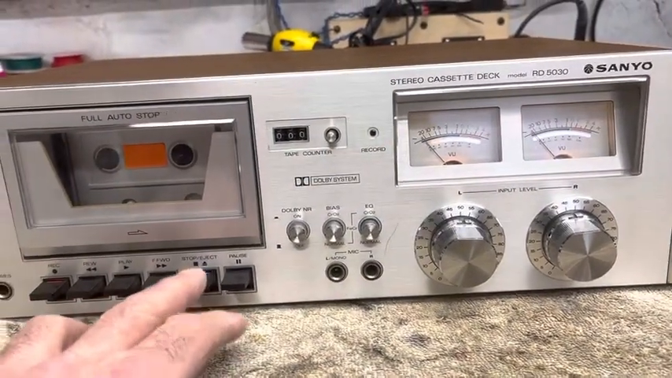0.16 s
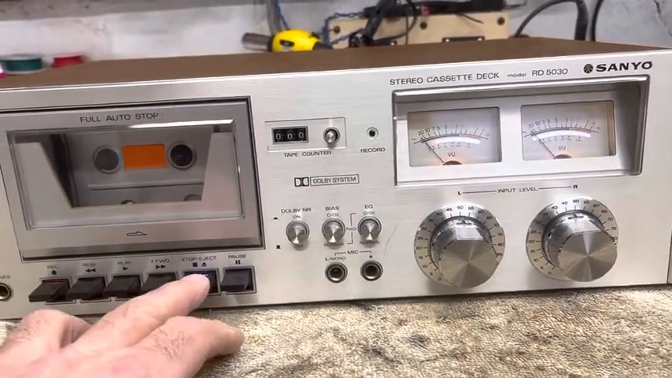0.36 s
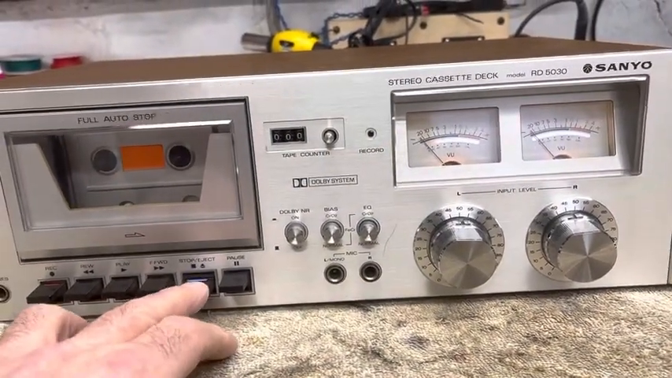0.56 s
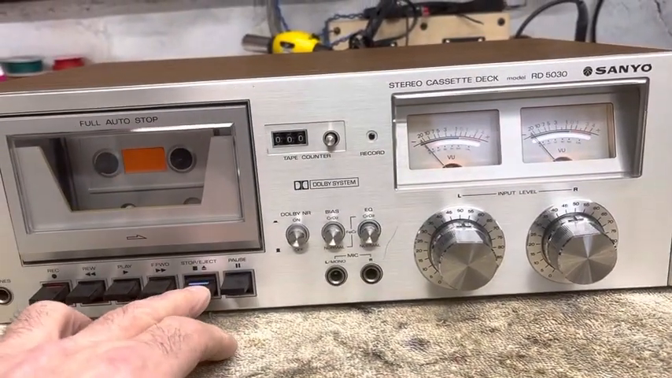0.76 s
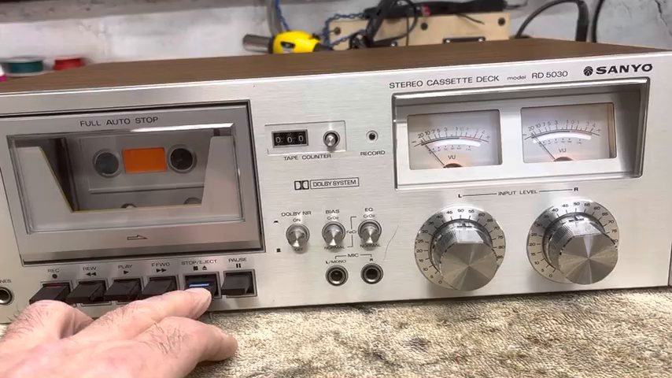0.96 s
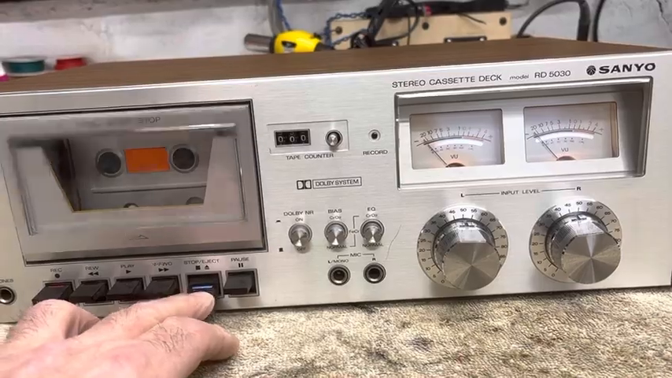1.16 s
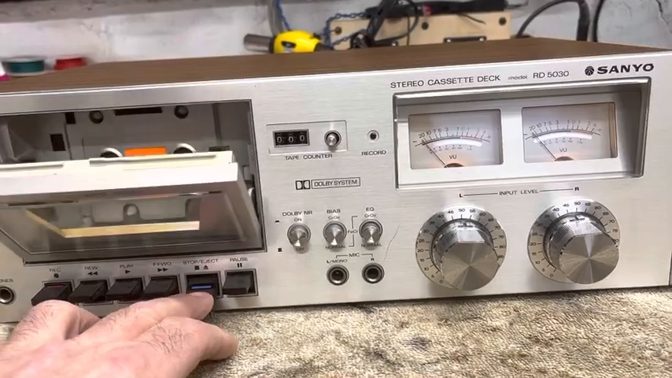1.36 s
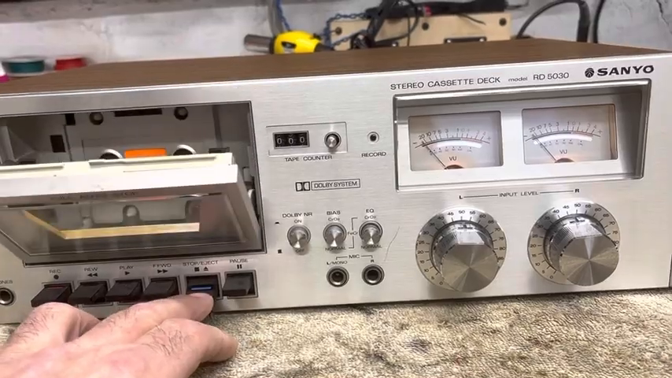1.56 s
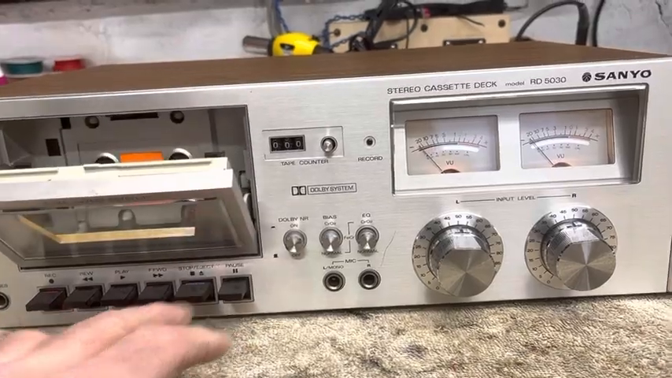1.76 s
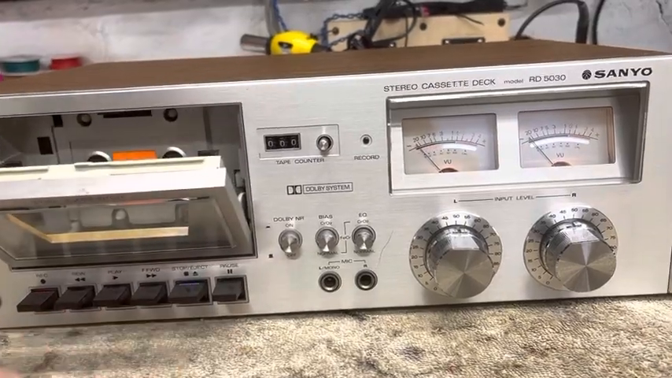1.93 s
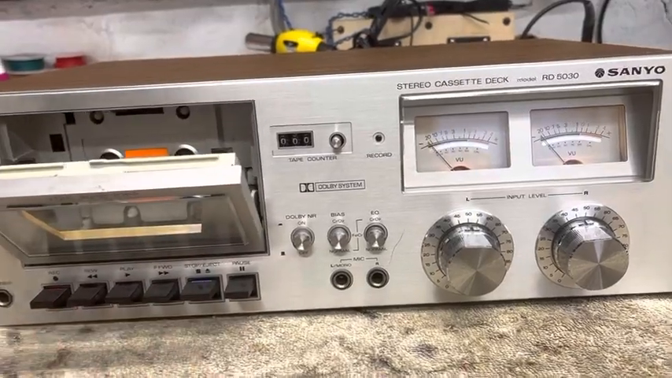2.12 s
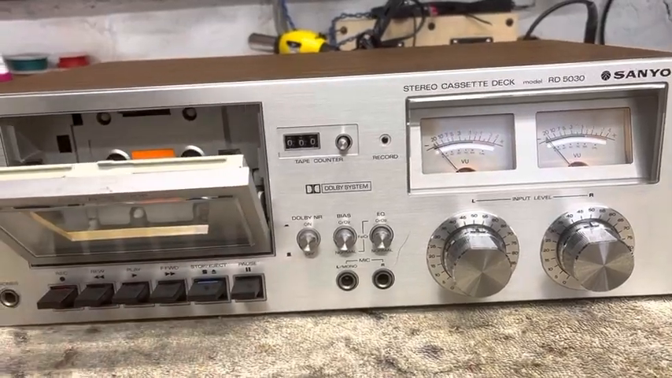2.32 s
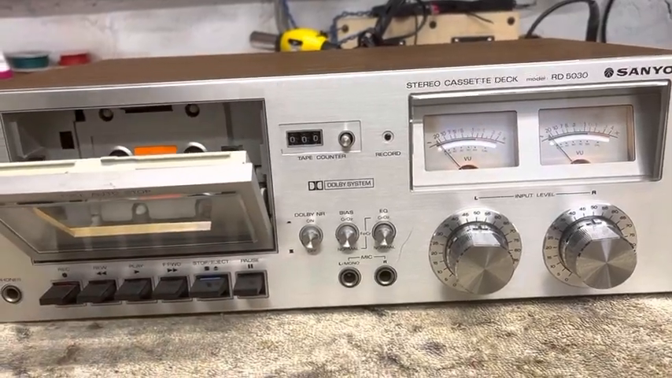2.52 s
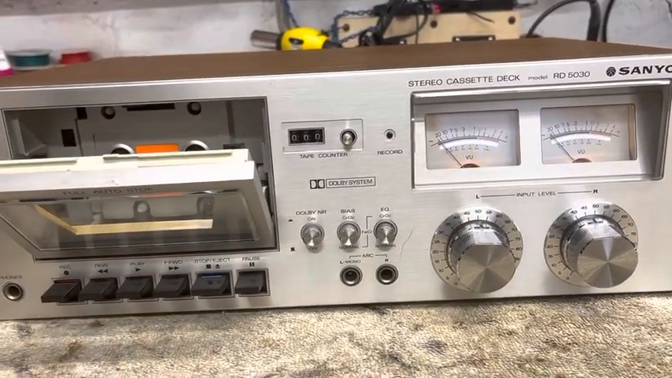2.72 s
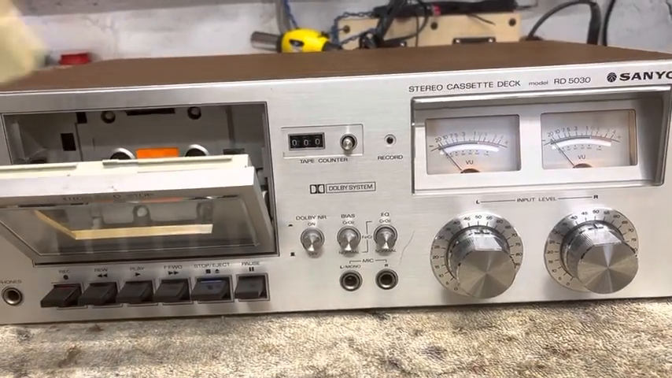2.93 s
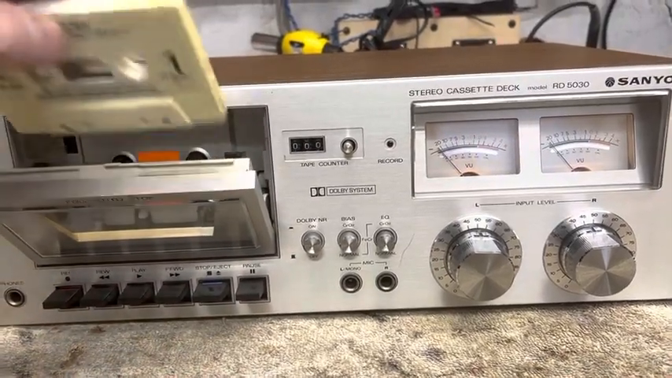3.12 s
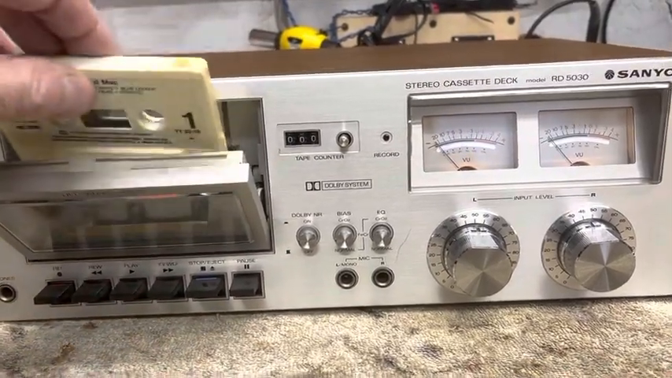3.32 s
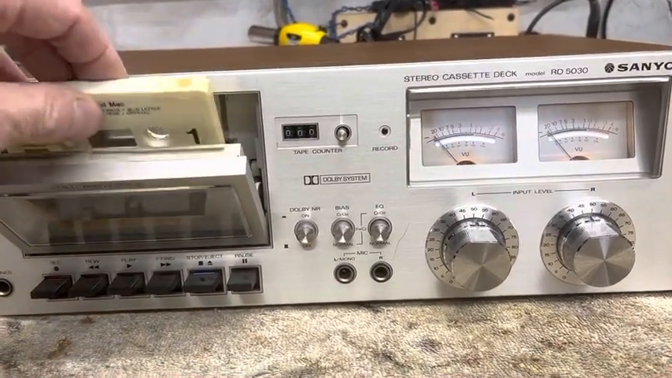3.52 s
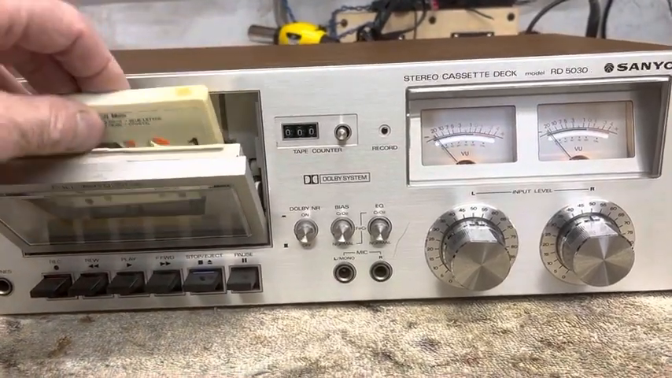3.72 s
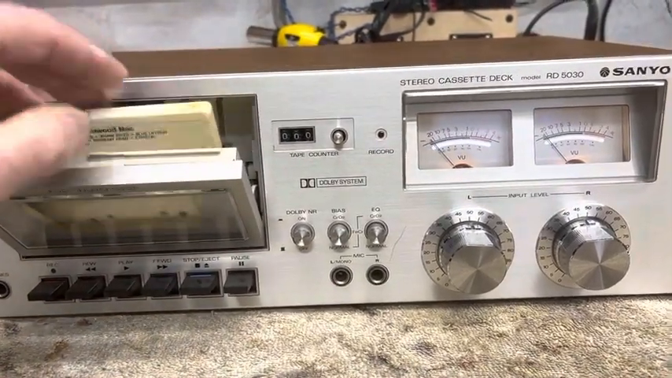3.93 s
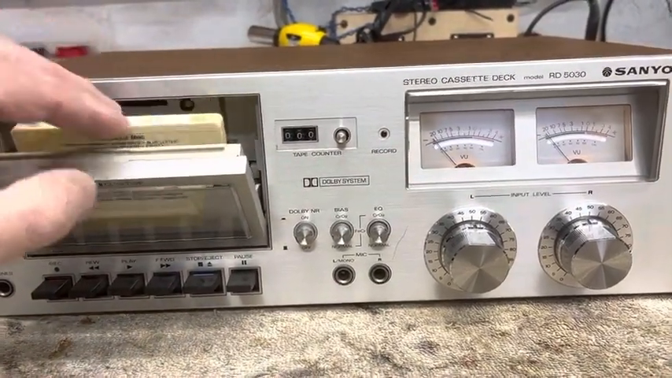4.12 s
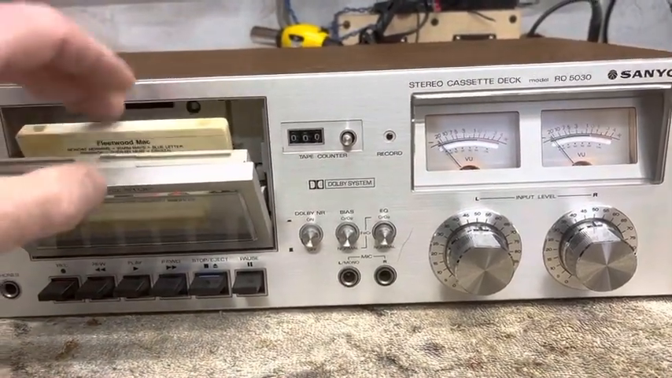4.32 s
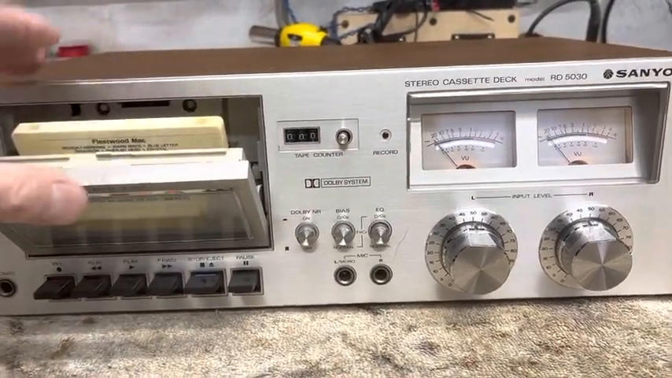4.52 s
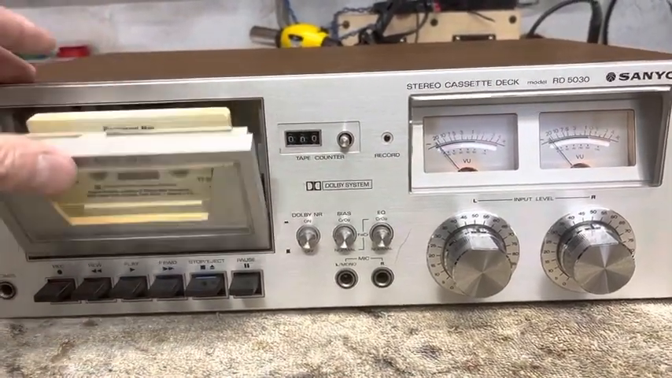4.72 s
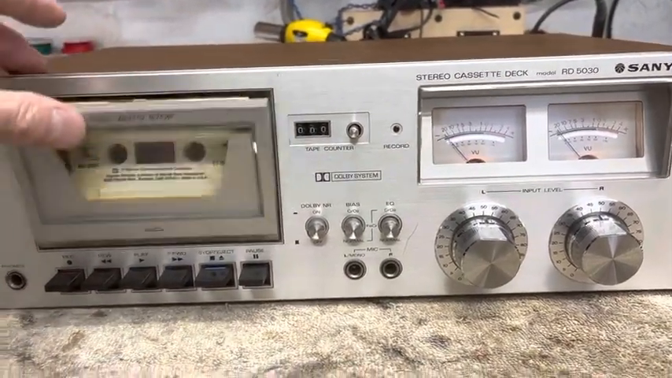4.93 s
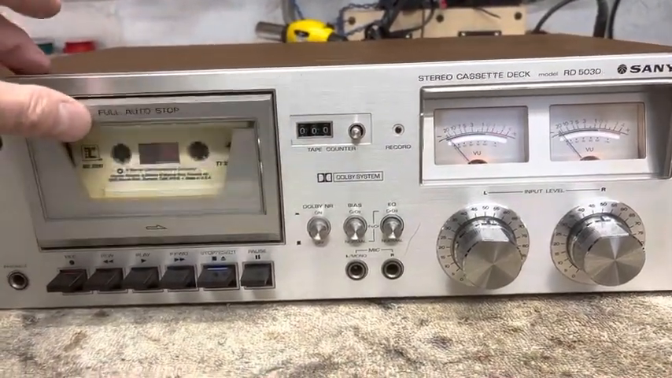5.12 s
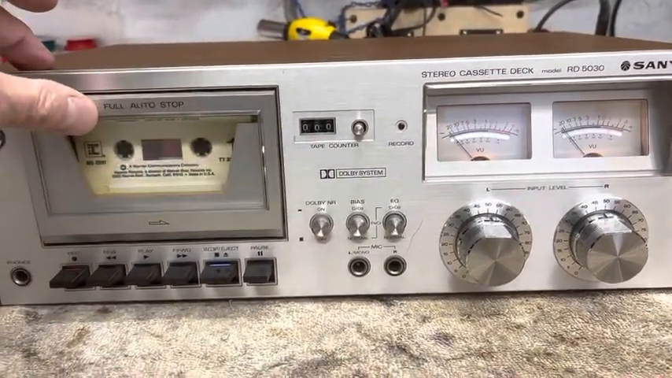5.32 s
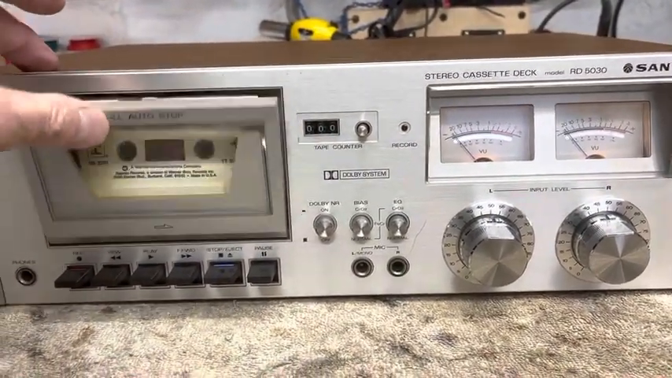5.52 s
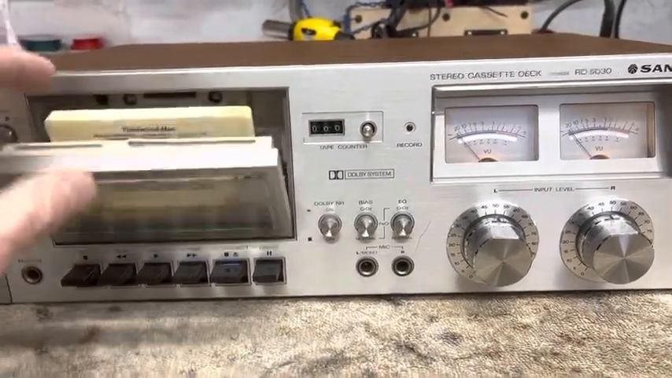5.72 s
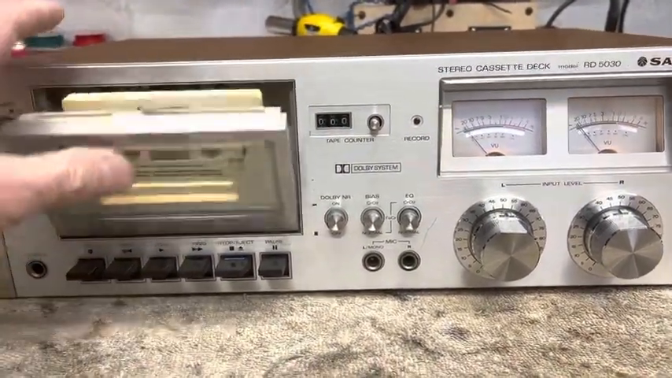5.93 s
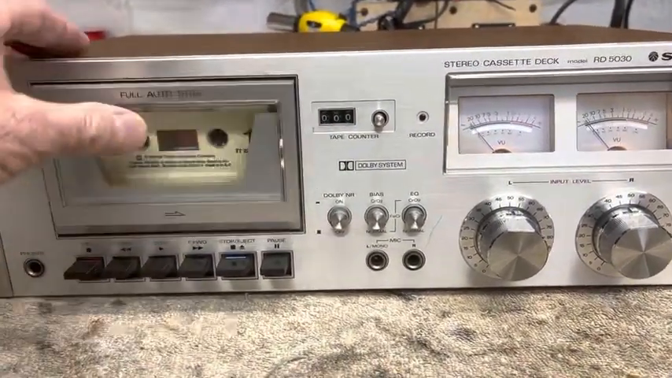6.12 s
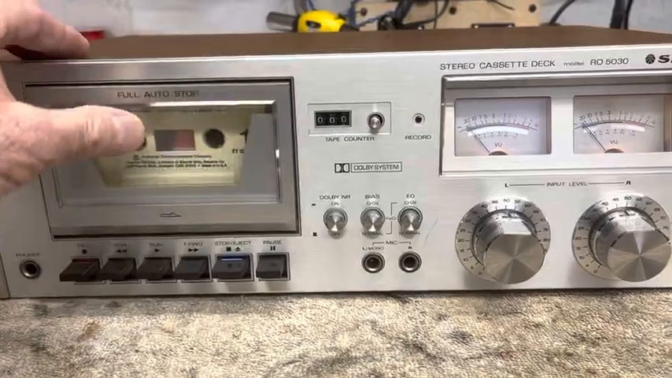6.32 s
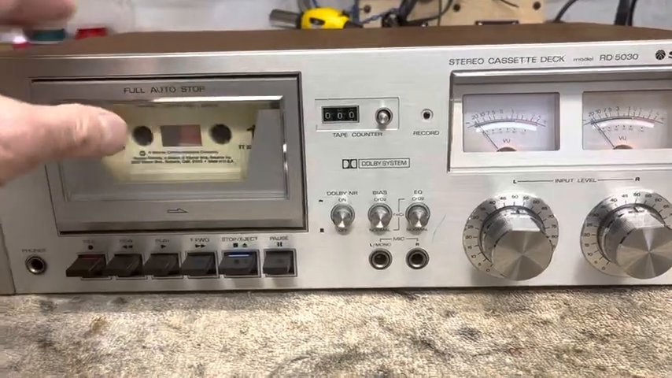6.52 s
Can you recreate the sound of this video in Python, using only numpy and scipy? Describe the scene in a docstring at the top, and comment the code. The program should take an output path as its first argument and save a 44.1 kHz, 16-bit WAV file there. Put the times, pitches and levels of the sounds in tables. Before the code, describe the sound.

Close, dry plastic clacks: latch pops, cassette scrapes and drops home, door fails to catch, then shuts with a louder hollow clack in a quietly humming room.

```python
"""A workbench in a small room that hums faintly, with a cassette deck close to a two-port microphone.
The eject key trips the latch and the sprung door clacks open; a cassette is picked up, scrapes into
the holder and drops home. The door is pushed in, fails to latch and swings back, then is pushed shut
with a loud plastic clack. Blows excite noise bands and damped modes, sliding is uneven filtered noise,
and the background is shaped noise with wavering sines."""
import sys
import numpy as np
from scipy import signal
from scipy.fft import irfft, next_fast_len
from scipy.io import wavfile
from scipy.ndimage import uniform_filter1d

SR = 44100
rng = np.random.default_rng(int(sys.argv[2]) if len(sys.argv) > 2 else 0)


def transcribe(u):
    """Save the signal u as a 16-bit wav file named by the first command-line argument.

    u: samples, shape (n,) or (channels, n), limited to [-1, 1]; the rate is SR.
    q: integer samples, one column per channel.
    """
    v = np.clip(np.atleast_2d(u).T, -1, 1)
    q = np.round(v * 32767).astype(np.int16)
    wavfile.write(sys.argv[1], SR, q)


N = 289737
TIME = np.arange(N) / SR
BANDS_HZ = 1000 * 2 ** (np.arange(-10, 13) / 3)  # centres a third of an octave apart
BAND_WIDTH = 2 ** (1 / 6) - 2 ** (-1 / 6)  # width of such a band over its centre


def from_db(db):
    """Decibels to amplitude gain."""
    return 10 ** (np.asarray(db) / 20)


def at_hz(points, hz):
    """Read a table of (Hz, value) on a log-frequency axis."""
    points = np.array(points)
    return np.interp(np.log(hz), np.log(points[:, 0]), points[:, 1])


def add(out, s, sound):
    """Mix a sound in from time s."""
    start = int(s * SR)
    out[:, start:start + sound.shape[1]] += sound[:, :N - start]


# The two microphone ports. Each row: frequency in Hz, radians by which left leads, left minus right
# in dB, likeness of the direct sound from 0 to 1, likeness of the room sound from 0 to 1.
PORTS = [(300, .18, .5, .98, .93), (730, .65, .5, .96, .45), (1100, 1.8, 3, .9, .3),
         (1900, .7, 1.5, .5, .35), (3200, .7, 4, .7, .3), (5200, -.7, 3.5, .55, .2),
         (11000, 1.4, .3, .35, .3)]
LEAD, BALANCE, DIRECT_LIKENESS, ROOM_LIKENESS = (np.array(PORTS)[:, [0, k]] for k in range(1, 5))


def ports(hz):
    """Complex gain of left and right: half of each phase and level difference goes to either side."""
    side = np.array([[.5], [-.5]])
    return from_db(side * at_hz(BALANCE, hz)) * np.exp(1j * side * at_hz(LEAD, hz))


def port_spectra(hz, likeness):
    """Random left and right spectra, partly alike because they share a mid signal."""
    mid, side = rng.standard_normal((2, len(hz))) + 1j * rng.standard_normal((2, len(hz)))
    alike = np.clip(at_hz(likeness, hz), 0, 1)
    return ports(hz) * (np.sqrt(1 + alike) * mid + np.sqrt(1 - alike) * side * [[1], [-1]])


def band_noise(centre, likeness, size):
    """A third of an octave of stereo noise, rms 1."""
    length = next_fast_len(size)
    hz = (np.arange(length // 2 + 1) + .5) * SR / length
    inside = np.abs(np.log2(hz / centre)) < 1 / 6
    spectrum = np.zeros((2, len(hz)), complex)
    spectrum[:, inside] = port_spectra(hz[inside], likeness)
    noise = irfft(spectrum, length)[:, :size]
    return noise / noise.std()


def coloured(spectrum, likeness):
    """Steady noise whose level in each third of an octave follows the table."""
    length = next_fast_len(N)
    hz = (np.arange(length // 2 + 1) + .5) * SR / length
    below_table = np.minimum(hz / spectrum[0][0], 1) ** 2  # fades under the lowest row
    per_bin = np.sqrt(length * SR / (hz * BAND_WIDTH) / 8)
    gain = from_db(at_hz(spectrum, hz)) * below_table * per_bin
    return irfft(gain * port_spectra(hz, likeness), length)[:, :N]


def ring(hz, t60, rise_s):
    """One mode that swells during the contact and then dies away."""
    t = TIME[:SR // 2]
    swing = np.exp(2j * np.pi * (hz * t + rng.random()))
    return (ports(hz) * swing).real * from_db(-60 * t / t60) * (1 - np.exp(-t / rise_s))


# Corners of the thud, knock, clack and tick ranges: frequencies in Hz.
ZONES_HZ = [250, 950, 3300, 11000]
THUD_DB, THUD_FOLLOWS = -19, 0.59  # thud at a 0 dB knock, and the share of the knock's dB it follows


def contact_db(row, hz):
    """How hard one contact drives a given frequency; the thud grows more slowly than the knock."""
    s, clack, knock, tick, chatter = row
    thud = THUD_DB + THUD_FOLLOWS * (clack + knock)
    return np.interp(np.log(hz), np.log(ZONES_HZ), [thud, clack + knock, clack, clack + tick])


def chatter_power(chatter_s, grit_db, rattle_db, rattle_s):
    """Uneven power of one contact: the blow, then small rebounds that follow it."""
    t = TIME[:SR // 6]
    phase = t / max(chatter_s, .0005)
    grit = np.repeat(rng.standard_normal(len(t)), repeats=SR // 2000)[:len(t)]  # held half a ms each
    blow = phase * np.exp(-2 * phase ** 2)
    rebounds = from_db(rattle_db) ** 2 * np.exp(-t / rattle_s) * np.minimum(phase, 1)
    return (blow + rebounds) * from_db(grit_db * grit) ** 2


# Key, latch, door and cassette strike the deck. Each row: start in seconds, clack drive in dB,
# knock in dB over the clack, tick in dB over the clack, chatter time in seconds.
CONTACTS = [(1.156, -50, 12.5, -14, 0.0036), (1.173, -36, 4.5, -5, 0.011), (1.1875, -22.5, -2, 3.5, 0.0036),
            (1.2, -41, 9.5, -14, 0.0071), (1.222, -25, -13, -17, 0.002), (1.229, -33, 7, -9, 0.0048),
            (1.2861, -30.5, -16, -20, 0.0013), (1.303, -43, 13.5, -12, 0.0095), (1.338, -57, 9, -5, 0.003),
            (1.629, -38.5, 0, -11, 0.0017), (1.652, -41, 5, -5, 0.0089), (1.671, -36.5, -3, -4, 0.0047),
            (3.28, -36, 1.5, -11.5, 0.002), (3.301, -34, -3, -18.5, 0.00061),
            (3.325, -43.5, 9, 1.5, 0.0021), (3.431, -41, -1, -24, 0.002), (3.459, -43.5, -12, -12, 0.002),
            (3.474, -43, -9, -9.5, 0.0028), (3.483, -40.5, -5, -41, 0.0015), (3.517, -43.5, 3, -17, 0.0047),
            (3.9, -47, 11.5, -10, 0.0088), (4.092, -39, 4.5, -5, 0.0056), (4.106, -30, 4, -0.5, 0.0031),
            (4.953, -41.5, 10.5, -22.5, 0.0019), (5.2139, -33.5, -10, -7.5, 0.0015),
            (5.2174, -22.5, 1, -11.5, 0.0064), (5.538, -37.5, 6.5, -9, 0.0037),
            (5.551, -34.5, -7, -18, 0.002), (5.572, -35, -1.5, -18, 0.0026),
            (5.583, -41, -6.5, -0.5, 0.0031), (5.625, -46.5, 8, -23, 0.0029),
            (5.992, -39.5, 3, -13.5, 0.0056), (6.024, -31, -1.5, -8.5, 0.012),
            (6.136, -32.5, 1.5, -12, 0.004), (6.1648, -13.5, -1.5, -11, 0.0073),
            (6.355, -28.5, 0.5, -22.5, 0.0029)]
# The dense modes of the plastic, shared by all contacts. Each row: frequency in Hz, dB per band.
PLASTIC = [(100, -23), (200, -5.5), (350, -9), (700, -7), (1400, -7.5), (1800, -9.5), (4000, -7.5),
           (6500, -4), (12000, 0.5), (16000, -11)]
# How long those modes last. Each row: frequency in Hz, t60 in seconds.
PLASTIC_T60 = [(300, 0.28), (900, 0.098), (3000, 0.035), (12000, 0.0024)]
BENCH_ECHO_DB = -6


def clacks(grit_db=5.5, colour_db=2.0, rattle_db=-23.5, rattle_s=0.0089, unit_s=0.0074):
    """Loose plastic chatters at each contact and feeds crowds of short-lived modes; the bench echoes it."""
    out, size = np.zeros((2, N)), SR // 6
    chatters = np.array([chatter_power(row[-1], grit_db, rattle_db, rattle_s) for row in CONTACTS])
    echo_lags = rng.uniform(.0007, .0016, len(CONTACTS))  # seconds
    for hz in BANDS_HZ:
        modes = band_noise(hz, DIRECT_LIKENESS, N + size)
        keep = from_db(-60 / (at_hz(PLASTIC_T60, hz) * SR)) ** 2  # power kept per sample
        envelopes = np.sqrt(signal.lfilter([1], [1, -keep], chatters + 1e-18))
        colours = colour_db * rng.standard_normal(len(CONTACTS))  # each spot struck favours other modes
        for row, envelope, colour, lag in zip(CONTACTS, envelopes, colours, echo_lags):
            burst = modes[:, int(row[0] * SR):][:, :size] * envelope
            echo = np.pad(burst, ((0, 0), (int(lag * SR), 0)))[:, :size]
            burst += from_db(BENCH_ECHO_DB) * echo
            burst *= np.sqrt(2 * unit_s * SR / np.sum(burst ** 2))  # energy of unit_s at rms 1
            add(out, row[0], burst * from_db(contact_db(row, hz) + at_hz(PLASTIC, hz) + colour))
    return out


# The metal case. Each row: frequency in Hz, level in dB, t60 in seconds.
CASE_MODES = [(178, -17, 0.28), (250.1, -15.5, 1), (354.3, -17.5, 0.4)]
# The door and its window. Each row: frequency in Hz, level in dB.
DOOR_MODES = [(535, -13.5), (732, -1.5), (885, -11), (1150, -3), (1425, -16.5), (1540, -11), (2160, -12),
              (3710, -8.5), (4780, -11.5), (6500, -12.5)]
DOOR_T60_S, MODE_SCATTER_DB = 0.0484, 2


def deck_ring():
    """Every contact also rings the case and the door, each mode with a strength of its own."""
    out = np.zeros((2, N))
    door = [(hz, db, DOOR_T60_S) for hz, db in DOOR_MODES]
    for hz, mode_db, t60 in CASE_MODES + door:
        for row, luck in zip(CONTACTS, rng.standard_normal(len(CONTACTS))):
            level_db = contact_db(row, hz) + mode_db + MODE_SCATTER_DB * luck
            add(out, row[0], ring(hz, t60, rise_s=0.0013) * from_db(level_db))
    return out


def struck(table, rise_s):
    """Single damped swings of one part or of the whole case."""
    out = np.zeros((2, N))
    for s, db, hz, t60 in table:
        add(out, s, from_db(db) * ring(hz, t60, rise_s))
    return out


# The thumb drives the door against its frame. Each row: start in seconds, level in dB.
SHOVES = [(6.03, -18.5), (6.148, -19), (6.1665, 0)]
SHOVE_DB_PER_OCTAVE, SHOVE_RISE_S = -5, 0.0025


def door_shoves():
    """Each shove rings all the modes of the door, tilted towards the low ones: a hollow knock."""
    swings = []
    for s, db in SHOVES:
        for hz, mode_db in DOOR_MODES:
            tilt_db = SHOVE_DB_PER_OCTAVE * np.log2(hz / DOOR_MODES[0][0])
            swings.append((s, db + mode_db + tilt_db, hz, DOOR_T60_S))
    return struck(swings, SHOVE_RISE_S)


# Some blows make one part sing out: door spring, cassette shell or latch.
# Each row: start in seconds, level in dB, frequency in Hz, t60 in seconds.
TWANGS = [(1.2312, -14, 4020, .017), (1.307, -33, 950, .09), (3.301, -31, 3850, .02),
          (3.432, -42.5, 3330, .06), (5.22, -25, 1900, .05), (5.358, -45, 3430, .022),
          (5.595, -32, 1200, .045)]


def twangs():
    """A part that sings out is one mode with a very quick rise."""
    return struck(TWANGS, rise_s=0.00014)


# The whole case rocks on its feet.
# Each row: start in seconds, level in dB, frequency in Hz, t60 in seconds.
THUMPS = [(1.19, -22.5, 235.4, 0.15), (1.228, -22, 212, 0.17), (1.24, -23, 73.6, 0.11),
          (1.28, -30, 58, 0.35), (3.305, -33.5, 210, 0.33), (4.108, -29, 240, 0.31),
          (4.125, -37, 72.7, 0.21), (6.012, -31, 360, 0.3), (6.188, -28, 242.4, 0.13)]


def thumps():
    """The rocking case is a low mode with a slower rise."""
    return struck(THUMPS, rise_s=0.0033)


STROKE_ATTACK_S, STROKE_T60_S = 0.024, 0.24


def stroke(start, length):
    """Force of one sliding movement: it takes hold, keeps its force and lets go."""
    t = TIME - start
    return np.clip(t / STROKE_ATTACK_S, 0, 1) * from_db(-60 * np.clip(t - length, 0, 1) / STROKE_T60_S)


# Key, door, cassette and fingers slide. Each row: start in seconds, length in seconds,
# friction force in dB, hiss in dB over the scrape.
STROKES = [(0.121, 0.018, -75, 9.5), (1.165, 0.11, -51, -6.5), (1.579, 0.25, -68.5, -8),
           (2.356, 0.2, -71.5, -4), (2.623, 0.14, -61, -1), (3.437, 0.089, -61, -4.5),
           (3.676, 0.27, -67, -4.5), (4.064, 0.04, -54.5, -4.5), (5.519, 0.065, -53.5, -4),
           (5.712, 0.02, -62.5, -1.5), (5.983, 0.033, -50, -5.5), (6.104, 0.076, -53, -8)]
# Colour of the friction. Each row: frequency in Hz, dB per band.
SCRAPE = [(500, -4), (1000, 8), (1800, 2), (6500, -1), (8300, -10), (10000, 9), (13000, 0), (16000, -24.5)]
HISS_ABOVE_HZ = 8000


def sliding(grain_db=4.0, scrape_db=-5.0):
    """Friction comes in tiny catches: the shell scrapes under an uneven force, and skin mostly hisses."""
    catches = uniform_filter1d(rng.standard_normal(N), size=130)
    friction = coloured(SCRAPE, DIRECT_LIKENESS)
    scrape = signal.sosfilt(signal.butter(6, HISS_ABOVE_HZ, "low", fs=SR, output="sos"), friction)
    hiss = signal.sosfilt(signal.butter(6, HISS_ABOVE_HZ, "high", fs=SR, output="sos"), friction)
    rubbing = 0
    for start, length, db, hiss_db in STROKES:
        rubbing = rubbing + from_db(db) * stroke(start, length) * (scrape + from_db(hiss_db) * hiss)
    return rubbing * from_db(scrape_db + grain_db * catches / catches.std())


# The cassette is tapped as it is handled, its reels rattling.
# Each row: start in seconds, level in dB, frequency in Hz that is driven hardest.
TAPS = [(2.512, -29, 1300), (2.648, -38, 4800), (2.663, -25.5, 2200), (2.691, -29, 1200),
        (2.716, -35, 1900), (2.808, -30, 3000), (2.963, -33.5, 2000), (4.322, -37, 4500)]
# Its hollow shell. Each row: frequency in Hz, level in dB.
SHELL_MODES = [(790, -4), (1420, -6), (1720, -1), (2400, -4), (3050, -8), (3650, -6), (4850, -4)]
SHELL_RING_CYCLES, TAP_RISE_S, TAP_LOSS_DB_PER_OCTAVE = 36, 0.0012, 8  # t60 lasts that many cycles
SLIPS_PER_S, SLIP_DB = 60, 10  # for each mode; median level over the friction force


def cassette_shell(spread_db=4.5):
    """Taps ring the shell's modes nearest their own pitch; each random slip of a stroke rings one mode."""
    force = sum(from_db(db) * stroke(start, length) for start, length, db, hiss_db in STROKES)
    out = 0
    for hz, mode_db in SHELL_MODES:
        slips = rng.random(N) < SLIPS_PER_S / SR
        strength_db = SLIP_DB + spread_db * np.clip(rng.standard_normal(N), -2, 2)
        drive = force * slips * from_db(strength_db)
        for s, db, tap_hz in TAPS:
            drive[int(s * SR)] += from_db(db - TAP_LOSS_DB_PER_OCTAVE * abs(np.log2(hz / tap_hz)))
        mode = from_db(mode_db) * ring(hz, SHELL_RING_CYCLES / hz, TAP_RISE_S)[:, :SR // 10]
        out = out + signal.oaconvolve(drive[None], mode, axes=1)[:, :N]
    return out


# Shell and door squeak faintly as they slide. Each row: start in seconds, length in seconds,
# level in dB, frequency in Hz, width in Hz.
SQUEAKS = [(3.89, 0.02, -57, 5430, 200), (4.471, 0.11, -69.5, 6800, 590)]


def squeaks():
    """Friction feeds one narrow resonance for the length of a stroke."""
    out = 0
    for start, length, db, hz, width in SQUEAKS:
        band = signal.butter(2, [hz - width / 2, hz + width / 2], "band", fs=SR, output="sos")
        tone = signal.sosfilt(band, rng.standard_normal(N))
        out = out + from_db(db) * stroke(start, length) * tone / tone.std()
    return out


# The small room. Each row: frequency in Hz, t60 in seconds, level in dB relative to the direct sound.
ROOM = [(100, 0.75, -10.5), (263, 0.32, -4.5), (840, 0.253, -21.5), (3917, 0.12, -16.5),
        (11870, 0.22, -42.5)]


def room(x, build_s=0.006):
    """Reflections of the left channel build up quickly and die away, the treble mostly sooner."""
    t, response = TIME[:SR // 2], 0
    room_hz, t60s, sends = np.transpose(ROOM)
    for hz in BANDS_HZ:
        t60 = np.interp(np.log(hz), np.log(room_hz), t60s)
        send_db = np.interp(np.log(hz), np.log(room_hz), sends)
        build_up = 1 - np.exp(-(t / build_s) ** 2)
        tail = band_noise(hz, ROOM_LIKENESS, len(t)) * from_db(-60 * t / t60) * build_up
        share = hz * BAND_WIDTH / (SR / 2)  # part of the whole spectrum in this band
        response = response + tail * np.sqrt(2 * share / np.sum(tail ** 2)) * from_db(send_db)
    return signal.fftconvolve(x[:1], response, axes=1)[:, :N]


# Room air. Each row: frequency in Hz, dB per band.
AIR = [(25, -90.5), (50, -65.5), (80, -60.5), (125, -69.5), (205, -51.5), (270, -58), (500, -63),
       (800, -58), (1300, -66), (2000, -67), (5500, -76.5), (8500, -99), (12500, -85)]
# Narrow resonances in which the air hums. Each row: frequency in Hz, peak in dB over the air.
AIR_RESONANCES = [(382, 1.5), (465, 8.5), (1005, 4), (1776, 8), (2062, 2.5)]
AIR_RESONANCE_WIDTH_HZ = 24


def room_air():
    """Dull noise, plus a second noise of the same colour through a few narrow resonances."""
    draught = coloured(AIR, ROOM_LIKENESS)
    resonances = 0
    for hz, db in AIR_RESONANCES:
        peak = signal.iirpeak(hz, hz / AIR_RESONANCE_WIDTH_HZ, fs=SR)
        resonances = resonances + from_db(db) * signal.lfilter(*peak, draught)
    return coloured(AIR, ROOM_LIKENESS) + resonances


# Motor and mains hum. Each row: frequency in Hz, rms level in dB about which it wavers.
HUM = [(59.7, -68), (118.8, -55), (237, -55.5)]
HUM_WAVERS_PER_S = 6.8


def low_hum(waver_db=1.5):
    """Steady low sines, each drifting between random levels."""
    hum = 0
    for hz, db in HUM:
        waver = np.interp(TIME * HUM_WAVERS_PER_S, np.arange(N), rng.standard_normal(N))
        tone = np.sin(2 * np.pi * (hz * TIME + rng.random()))
        hum = hum + np.sqrt(2) * from_db(db + waver_db * waver) * tone
    return hum


def scene():
    """The deck close by, the room's answer to its plastic sounds, and the background."""
    plastic = clacks() + sliding() + cassette_shell() + squeaks() + door_shoves()
    body = deck_ring() + twangs() + thumps()
    return plastic + room(plastic) + body + room_air() + low_hum()


CUTOFF_HZ = 16300


def record(dry, roll_off_hz=14200, leak=0.05):
    """A narrow treble band around 8.5 kHz is hollowed out; peaks are rounded and the top is cut."""
    notched = signal.lfilter(*signal.iirnotch(8500, 4, fs=SR), dry)
    roll_off = signal.butter(5, roll_off_hz, fs=SR, output="sos")
    heard = np.tanh(signal.sosfilt(roll_off, notched + leak * (dry - notched)))
    return signal.sosfilt(signal.ellip(10, .1, 80, CUTOFF_HZ, fs=SR, output="sos"), heard)


dry = scene()
out = record(dry)
transcribe(out)
```